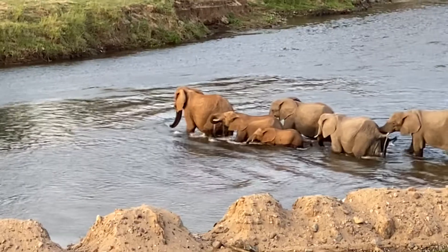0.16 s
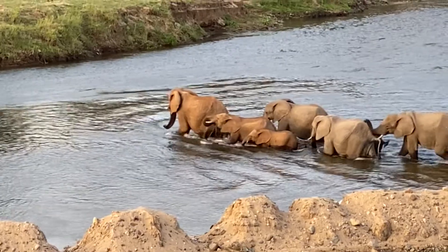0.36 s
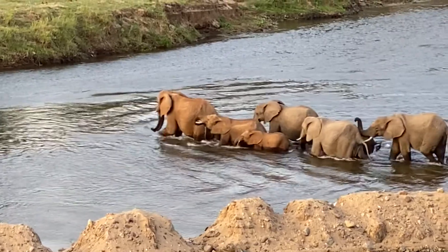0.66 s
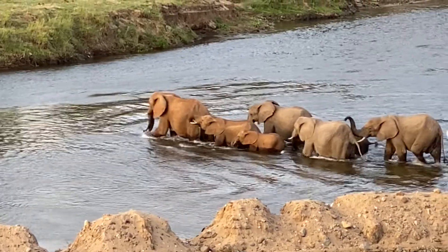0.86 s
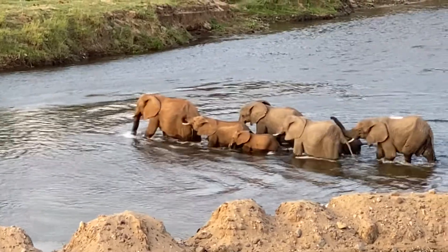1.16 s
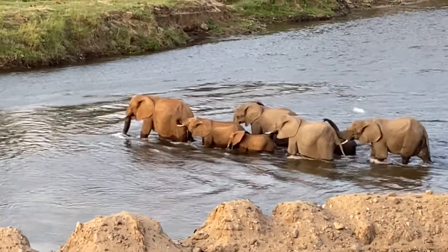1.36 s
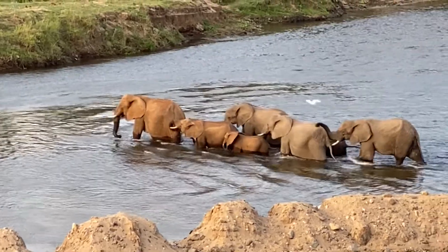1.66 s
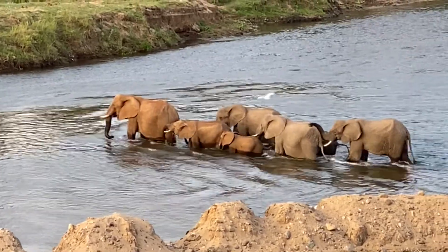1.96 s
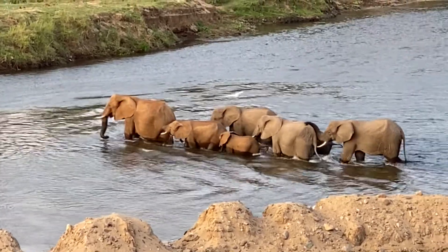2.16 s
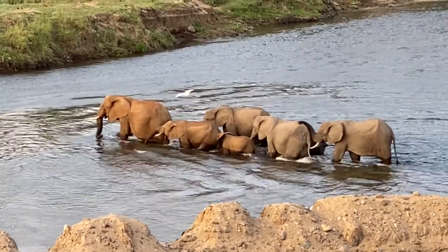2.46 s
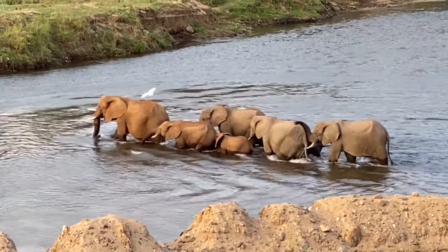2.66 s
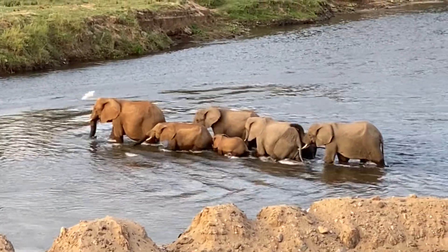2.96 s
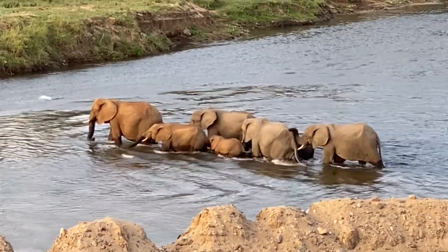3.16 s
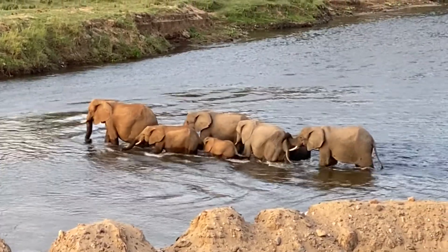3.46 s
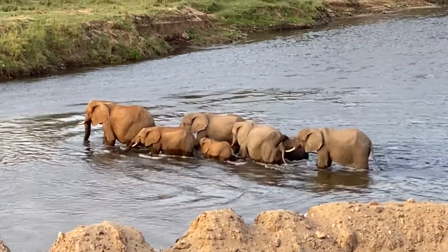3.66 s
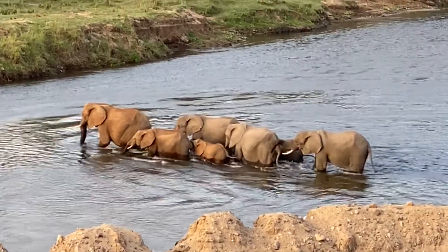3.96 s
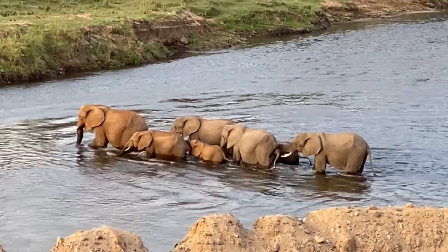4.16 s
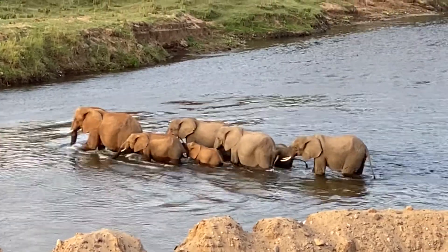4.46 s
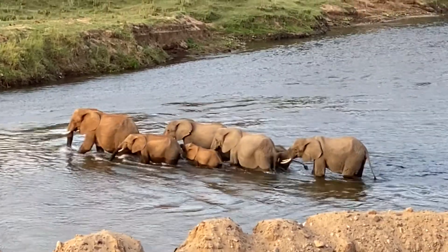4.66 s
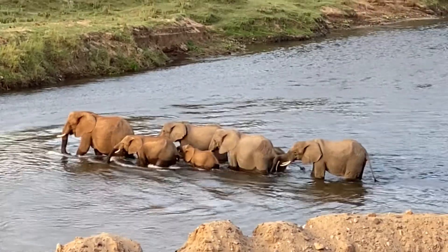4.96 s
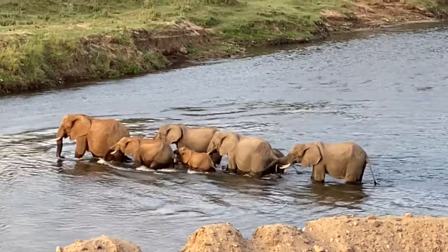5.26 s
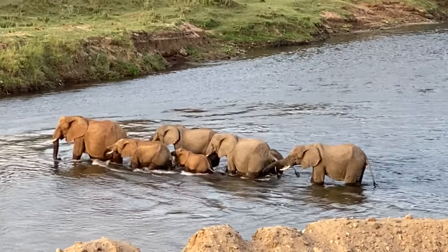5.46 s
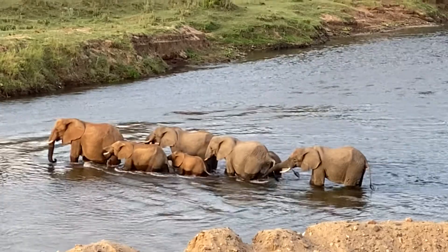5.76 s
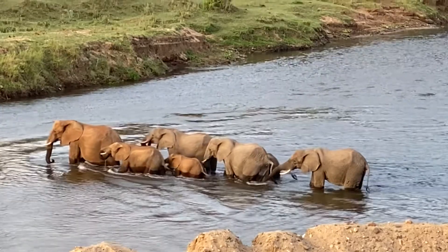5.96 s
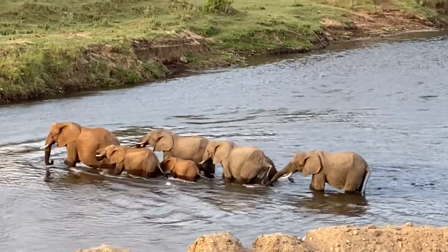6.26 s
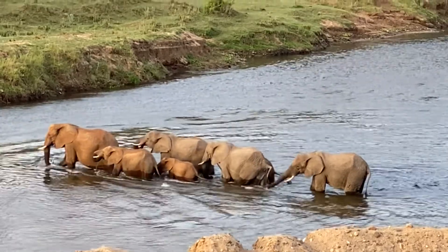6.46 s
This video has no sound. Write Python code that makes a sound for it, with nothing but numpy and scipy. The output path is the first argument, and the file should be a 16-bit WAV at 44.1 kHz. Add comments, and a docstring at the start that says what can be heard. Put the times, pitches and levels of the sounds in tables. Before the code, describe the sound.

A quiet riverbank with flowing water, small splashy swishes and snaps, and insects rasping in short pulsing phrases. A mellow bird whistle slides upward again and again at even spacing. Distant birds add tiny chips, a quick run of falling notes and rough trills. The later part is dominated by lumpy, low wind buffets hitting the exposed microphone, easing briefly before another strong gust at the end.

```python
"""Insects buzz and rasp over rushing water and faint steady tones; a bird soon begins its rising whistle.
The scene is a river bank in open country where elephants wade across, splashing, and more birds sing far off.
Gusts of wind buffet the microphone in deep lumps. Birds are gliding near-sines with a scattered echo;
insects are resonant noise gated by wing strokes; water and wind are coloured noise with changing level."""
import sys
import numpy as np
from scipy import signal
from scipy.io import wavfile
from scipy.ndimage import uniform_filter1d

SR = 44100
rng = np.random.default_rng(int(sys.argv[2]) if len(sys.argv) > 2 else 0)


def to_wav(sig):
    """Store sig (one row per channel, or 1-D mono) as 16-bit WAV at the path in sys.argv[1].

    Samples outside -1..1 are clipped; the rate is SR.
    """
    pcm = np.clip(np.atleast_2d(sig), -1, 1) * 32767
    pcm = np.round(pcm).astype(np.int16)
    wavfile.write(sys.argv[1], SR, pcm.T)  # frames by channels


def boost(x):
    """Linear amplitude factor 10**(x/20) for a level x in decibels (scalar or array-like)."""
    u = np.asarray(x, float) / 20
    return 10 ** u


N = 290619
TIME = np.arange(N) / SR

# Steady thin tones. Each row: frequency in Hz, mean level in dB.
THIN_TONES = [(962, -66), (1492, -67), (1733, -58.5), (1974, -55), (2214, -67), (2355, -67.5)]

# Level of a long-winded insect. Each row: time in seconds, level in dB.
BUZZER_LEVEL = [(0, -56), (1.5, -59.5), (1.7, -65.5), (3.1, -66), (3.35, -60), (5.45, -56.5), (5.6, -65),
                (6.59, -70)]
BUZZER_HZ, BUZZER_STROKES_PER_S = 4440, 69
# Phrases of the rasping insect, of uneven length; long and short alternate only at first.
# Each row: start in seconds, length in seconds.
RASP_PHRASES = [(-.1, .43), (.67, 0.27), (1.24, .4), (1.87, 0.29), (2.44, 0.42), (3.04, 0.32), (3.71, 0.36),
                (4.28, 0.35), (4.95, 0.39), (5.59, 0.36), (6.21, .36)]
RASP_DB = -60.5

# Colour of the river's rush. Each row: frequency in Hz, relative density in dB per Hz.
RUSH_COLOUR = [(24, -35), (40, -3), (66, -2.5), (167, -18.5), (235, -8.5), (523, -5), (806, -14.5),
               (938, -5.5), (1410, -8.5), (1790, -4.5), (3820, -18.5), (4540, -29), (7000, -37),
               (9100, -94), (15400, -120)]
RUSH_DB = -46.5
# Swishes of spray as the animals wade. Each row: centre in seconds, spread in seconds, level in dB.
SWISHES = [(.16, 0.072, -67), (.48, 0.034, -58), (2.07, .04, -71), (2.85, 0.02, -65), (3.64, 0.054, -69.5),
           (3.9, 0.036, -70), (4.5, 0.025, -61.5), (4.8, 0.024, -72), (5.44, 0.053, -66)]
# Colour of the hiss and spray. Each row: frequency in Hz, relative density in dB per Hz.
HISS_COLOUR = [(4500, 9.5), (6800, -2.5), (8200, 5.5), (10000, 4), (11500, 3), (12800, -5), (14500, 2),
               (16600, 0)]
# Lone snaps of water or grass. Each row: start in seconds, nominal peak in dB before filtering.
WATER_SNAPS = [(0.165, -39), (1.4052, -44), (1.579, -45), (2.836, -46), (4.2816, -42.5), (4.4653, -44),
               (4.568, -26), (4.786, -44.5), (5.9878, -42)]
# Plops of water. Each row: start in seconds, frequency in Hz, starting level in dB.
WATER_PLOPS = [(.115, 440, -46), (1.052, 520, -47)]
PLOP_T60_S = 0.06

# Straight glides of farther birds.
# Each row: start in seconds, length in seconds, first Hz, last Hz, nominal level in dB.
FAR_GLIDES = [(2.694, .018, 4200, 3820, -53), (2.671, .022, 2780, 3070, -52), (2.74, .03, 4600, 4650, -57),
              (4.29, .05, 4900, 5230, -59), (4.69, .043, 3160, 3140, -53), (4.737, .022, 3080, 2900, -50),
              (4.765, .018, 2800, 2680, -52), (4.785, .052, 2620, 2520, -42), (4.833, .08, 2510, 2535, -39),
              (5.245, .035, 3720, 3700, -57), (5.852, .02, 4450, 5000, -54), (5.89, .065, 2500, 3070, -55),
              (5.99, .1, 2850, 2800, -60)]
# A songbird's run of scooped notes. Each row: start in seconds, middle Hz, nominal level in dB.
SCOOPED_NOTES = [(5.292, 3420, -45), (5.344, 3320, -43.5), (5.393, 3220, -49), (5.417, 3260, -53),
                 (5.445, 3166, -48), (5.488, 3200, -53)]
SCOOP_S, SCOOP_FALL_HZ, SCOOP_LIFT_HZ = 0.029, 260, 90
# Arched chips of small birds. Each row: start in seconds, length in seconds, top Hz, nominal level in dB.
ARCHED_CHIPS = [(2.54, .036, 3830, -57), (3.44, .02, 5500, -63), (3.997, .03, 4950, -56),
                (4.095, .04, 4820, -59), (4.385, .02, 5350, -54), (4.405, .025, 5450, -52),
                (4.48, .045, 5400, -54)]
ARCH_SHARE = 0.065  # both ends lie this share below the top
# Warbled, rough notes. Each row: start in seconds, length in seconds, first Hz, last Hz,
# swing in Hz, swings per second, nominal level in dB.
WARBLES = [(5.585, .1, 6750, 6800, 110, 90, -64), (4.98, .27, 2930, 2770, 180, 62, -50.5),
           (5.655, .1, 4600, 2800, 250, 70, -55), (3.785, .055, 6400, 7100, 200, 90, -67),
           (5.345, .065, 6450, 6850, 250, 80, -66)]

# The whistling bird. Each row: start in seconds, climb in seconds, first Hz, middle Hz, top Hz,
# droop after the top in seconds, nominal level in dB.
RISING_WHISTLES = [(.255, .14, 1740, 1830, 1965, 0.046, -49), (1.03, .19, 1754, 1870, 1943, 0, -49),
                   (1.82, 0.18, 1755, 1823, 1947, 0.068, -38.5),
                   (2.585, 0.2, 1785, 1874, 1950, 0.044, -38.5), (3.396, .19, 1752, 1814, 1965, .04, -35.5),
                   (4.182, .195, 1772, 1834, 1965, 0, -36), (5.015, .155, 1795, 1888, 1960, 0, -37.5),
                   (5.788, 0.17, 1768, 1854, 1925, 0, -40), (6.53, 0.17, 1760, 1840, 1955, 0, -42)]
DROOP_MEAN_HZ_PER_S, DROOP_DB = 800, -6.5  # some linger, softer and sinking; dB against the whistle
CLOSING_S, CLOSING_HZ, CLOSING_DB = 0.055, 1745, -12  # short low note; dB against the whistle

# Buffets of wind. Each row: peak in seconds, nominal rumble level in dB, time to fade by 20 dB in seconds.
WIND_BUFFETS = [(.26, -50, 0.2), (.628, -41, .03), (.672, -40, .03), (2.267, -47.5, .06), (2.395, -35, .05),
                (2.812, -32, 0.07), (2.855, -40, .06), (3.3, -46, 0.1), (3.74, -50, .1), (3.81, -24, 0.09),
                (3.885, -20.5, 0.09), (3.935, -20.5, 0.08), (3.985, -11.5, 0.08), (4.018, -14, 0.06),
                (4.093, -20, .07), (4.17, -29, 0.08), (4.245, -17, 0.12), (4.35, -26, 0.02),
                (4.45, -30, .05), (4.52, -17.5, 0.1), (4.6, -21, 0.04), (4.69, -36, .1),
                (4.782, -28.5, .06), (4.825, -24, .07), (4.876, -20, 0.07), (4.945, -24, 0.06),
                (5.021, -21.5, 0.07), (5.14, -28, 0.1), (5.205, -29, .05), (5.32, -30, 0.15),
                (5.428, -21, 0.05), (5.5, -25, 0.09), (5.64, -32.5, 0.08), (5.75, -37, 0.1),
                (6.044, -31, 0.23), (6.28, -22.5, 0.07), (6.319, -17.5, .07), (6.4, -32, 0.15),
                (6.44, -22, .06), (6.497, -10, 0.09), (6.535, -15.5, 0.08)]
RISE_OVER_FADE, BREEZE_DB = 0.79, -60  # a buffet rises faster than it fades; level between buffets
# Colour of the rumble. Each row: frequency in Hz, relative density in dB per Hz.
RUMBLE_COLOUR = [(26, -43), (38, -4), (52, 8.5), (85, 3.5), (135, -4), (200, -17), (280, -25.5)]
# Bursts of flutter. Each row: start in seconds, hold in seconds, nominal level in dB.
FLUTTER_BURSTS = [(1.917, .01, -44.5), (3.796, 0.0043, -30.5), (3.918, .004, -27.5), (3.956, 0.032, -17),
                  (4, .008, -21), (4.022, .005, -30), (4.066, 0.024, -30.5), (4.215, .01, -34),
                  (4.241, .03, -23), (4.289, 0.014, -35.5), (4.468, .016, -34), (4.493, 0.115, -30),
                  (4.86, .035, -36), (5.003, 0.0094, -35), (6.259, 0.0036, -28.5), (6.298, 0.045, -28),
                  (6.43, 0.012, -36), (6.458, .016, -28.5), (6.487, 0.045, -22), (6.544, 0.029, -39)]
FLUTTER_RISE_DB_PER_S, FLUTTER_FALL_DB_PER_S, FLUTTER_REST_DB = 2300, 1250, -59.5
# Colour of the flutter. Each row: frequency in Hz, relative density in dB per Hz.
EDDY_COLOUR = [(100, 11), (185, 7), (320, 0), (600, -11.5), (1000, -26), (1350, -52)]
FLUTTER_BRIGHTENS, FLUTTER_EVEN_DB = 0.38, -21  # extra treble dB per dB of strength; none at this strength
# Small quick eddies come first: share of the hold that stays bright, lag of the lows
BRIGHT_SHARE, LOWS_LAG_S = 0.8, 0.008
# Eddies that snap across the port. Each row: start in seconds, peak in dB.
EDDY_POPS = [(3.9195, -10), (4.006, -11), (4.073, -23), (4.230, -14), (4.494, -21), (5.007, -24),
             (6.298, -22), (6.488, -15)]
POP_S = 0.00085  # time to the deepest point


def rms_one(x):
    """Normalization: divides a signal by its root mean square."""
    return x / np.sqrt(np.mean(x ** 2) + 1e-20)


def drift(rate_hz):
    """Slow random fluctuation: white noise through two equal poles, with rms 1."""
    r = np.exp(-40 * np.pi * rate_hz / SR)  # made at a twentieth of the sample rate
    white = rng.standard_normal(N // 20 + 4002)
    slow = signal.lfilter([1], [1, -2 * r, r * r], white)[4000:]
    return np.interp(np.arange(N) / 20, np.arange(len(slow)), rms_one(slow))


def band(x, low_hz, high_hz):
    """Band limitation by a Butterworth filter."""
    return signal.sosfilt(signal.butter(2, [low_hz, high_hz], "band", fs=SR, output="sos"), x)


def noise_bands(colour, count):
    """Spectral synthesis: yields weighted bands of noise; neighbouring bands are independent."""
    hz, db = np.transpose(colour)
    edges = np.geomspace(hz[0], hz[-1], count + 1)
    white = rng.standard_normal((2, N))
    for k in range(count):
        centre = np.sqrt(edges[k] * edges[k + 1])
        gain = boost(np.interp(np.log(centre), np.log(hz), db))
        yield gain * band(white[k % 2], edges[k], edges[k + 1])


def clicks(events):
    """Impulse excitation: one sample per event."""
    out = np.full(N, 1e-18)
    for start, db in events:
        out[round(start * SR)] = boost(db)
    return out


def gate(start, length, edge):
    """Smooth gating: sine-squared edges, each lasting edge seconds."""
    inside = np.minimum(TIME - start, start + length - TIME)
    return np.sin(np.pi / 2 * np.clip(inside / edge, 0, 1)) ** 2


def tones():
    """Steady sinusoids: slight phase drift and a random waver in level."""
    return sum(np.sqrt(2) * boost(db + 2.8 * drift(4.5)) * np.sin(2 * np.pi * (hz * TIME + 0.1 * drift(3.1)))
               for hz, db in THIN_TONES)


def buzzing_insect():
    """Pulsed resonance: wing strokes gate noise and strike ticks within a narrow band."""
    strokes = np.cumsum(BUZZER_STROKES_PER_S * (1 + 0.0015 * drift(1.5))) / SR % 1
    buzz = rng.standard_normal(N) * (0.6 + np.exp(-strokes / 0.051))
    ticks = 1.0 * (np.diff(strokes, prepend=0) < 0)  # each stroke opens with a like tick
    buzz, ticks = (rms_one(band(v, BUZZER_HZ - 260, BUZZER_HZ + 260)) for v in (buzz, ticks))
    seconds, db = np.transpose(BUZZER_LEVEL)
    return rms_one(buzz + 0.6 * ticks) * boost(np.interp(TIME, seconds, db))


def rasping_insect():
    """Amplitude modulation: wing strokes beat resonant noise, which sounds in phrases."""
    beats = 1 + 0.6 * np.sin(2 * np.pi * 62 * TIME + 2 * drift(6.0))
    noise = band(rng.standard_normal(N), 4450, 5300)
    rasp = rms_one(band(noise, 4400, 5300) * beats)
    phrases = sum(gate(start, length, 0.067) for start, length in RASP_PHRASES)
    return rasp * boost(RASP_DB + 1.1 * drift(7.8)) * phrases


def rush():
    """Broadband flow noise: all bands share a slow swell, and each also fluctuates alone."""
    swell = drift(1.17)
    flow = sum(noise * boost(0.77 * swell + 1.17 * drift(16.4)) for noise in noise_bands(RUSH_COLOUR, count=20))
    return boost(RUSH_DB) * rms_one(flow)


def hiss_and_spray():
    """Treble noise: a steady hiss, partly the microphone's own, with swishes of spray swelling over it."""
    hiss = rms_one(sum(noise_bands(HISS_COLOUR, count=16)))
    swishes = sum(boost(db) * np.exp(-((TIME - s) / spread) ** 2) for s, spread, db in SWISHES)
    level = boost(-71.0) + swishes
    return hiss * level * boost(1.3 * drift(45.0) + 1.7 * drift(13.5))  # the level flickers


def snaps():
    """Transient excitation: each impulse releases a short decaying crack of noise."""
    crack = rng.standard_normal(220) * boost(-60 * np.arange(220) / SR / 0.018)
    cracks = signal.fftconvolve(clicks(WATER_SNAPS), crack)[:N]
    return boost(-4.5) * band(cracks, 6700, 11300) + band(cracks, 1700, 6800)


def plops():
    """Cavity resonance: a closing pocket of air rings as a decaying sinusoid."""
    out = 0
    for start, hz, db in WATER_PLOPS:
        t = np.maximum(TIME - start, 0)
        out = out + boost(db - 60 * t / PLOP_T60_S) * np.sin(2 * np.pi * hz * t)
    return out


def notes(rows, swell, softness, waver_db):
    """Frequency modulation: near-sines glide through three pitches; swell (dB) favours the later part."""
    out = np.zeros(N)
    for start, length, first_hz, middle_hz, last_hz, db in rows:
        at = round(start * SR)
        u = np.arange(round(length * SR)) / (length * SR)  # 0 to 1 over the note
        hz = np.polyval(np.polyfit([0, 0.5, 1], [first_hz, middle_hz, last_hz], 2), u)
        shape = np.sin(np.pi * u) ** softness * boost(swell * (np.minimum(u, 0.75) - 1.75))
        tone = np.sqrt(2) * boost(db) * shape * np.sin(2 * np.pi * np.cumsum(hz) / SR)
        out[at:at + len(u)] += tone[:N - at]
    return out * boost(waver_db * drift(35.0))


def far_birds():
    """Pitch contour: straight glides, scooped notes and arched chips."""
    rows = [(s, length, first, (first + last) / 2, last, db) for s, length, first, last, db in FAR_GLIDES]
    rows += [(s, SCOOP_S, hz + SCOOP_FALL_HZ, hz, hz + SCOOP_LIFT_HZ, db) for s, hz, db in SCOOPED_NOTES]
    for s, length, top, db in ARCHED_CHIPS:
        end = top * (1 - ARCH_SHARE)
        rows.append((s, length, end, top, end, db))
    return notes(rows, swell=0, softness=0.21, waver_db=1.0)


def trill():
    """Joint modulation: pitch swings fast and unevenly about a glide while the level beats with it."""
    out = 0
    for start, length, first_hz, last_hz, swing_hz, per_s, db in WARBLES:
        turn = 2 * np.pi * per_s * TIME + 2.0 * drift(25.0)
        glide = np.interp(TIME, [start, start + length], [first_hz, last_hz])
        hz = glide + swing_hz * np.sin(turn)
        beat = 1 - 0.4 * np.cos(turn)
        level = boost(db + 1.6 * drift(25.0)) * gate(start, length, 0.21 * length) * beat
        out = out + np.sqrt(2) * level * np.sin(2 * np.pi * np.cumsum(hz) / SR)
    return out


def whistler():
    """Pitch contour: each rising whistle may droop from its top; all but the last add a low note."""
    rows = []
    for s, climb, first, middle, top, droop, db in RISING_WHISTLES:
        rows.append((s, climb, first, middle, top, db))
        if droop:
            fall = DROOP_MEAN_HZ_PER_S * droop
            rows.append((s + climb, droop, top, top - fall / 4, top - fall, db + DROOP_DB))
    for s, climb, *_, db in RISING_WHISTLES[:-1]:
        rows.append((s + climb, CLOSING_S, CLOSING_HZ, CLOSING_HZ, CLOSING_HZ, db + CLOSING_DB))
    return notes(rows, swell=2.2, softness=0.25, waver_db=1.3)


def banks(x, t60, scatter_db):
    """Diffuse reflection: banks and bushes send back an exponentially dying scatter."""
    t = np.arange(round(0.6 * SR)) / SR
    tail = rng.standard_normal(len(t)) * boost(-60 * t / t60)
    tail *= boost(scatter_db) / np.sqrt(np.sum(tail ** 2))
    tail[0] = 1  # the direct sound
    return signal.fftconvolve(x, tail)[:N]


def swells(start, hold, db, rise_db_per_s, fall_db_per_s, rest_db):
    """Power addition: swells climb, hold and fall in straight dB slopes above a resting level."""
    coarse = TIME[::20, None]
    early = np.maximum(start - coarse, 0)
    late = np.maximum(coarse - start - hold, 0)
    each = boost(db - rise_db_per_s * early - fall_db_per_s * late)
    power = np.sum(each ** 2, axis=1) + boost(rest_db) ** 2
    return np.interp(TIME, TIME[::20], np.sqrt(power))


def eddies(colour, evenness, size):
    """Turbulent noise: dividing by its own running strength (size in samples) evens its level."""
    out = sum(noise_bands(colour, count=7))
    strength = np.sqrt(uniform_filter1d(out ** 2, size=size) + 1e-12)
    return rms_one(out / strength ** evenness)


def rumble():
    """Low-frequency turbulence: each buffet raises and releases a deep noise."""
    peak, db, fade = np.transpose(WIND_BUFFETS)
    push = swells(peak, 0, db, 20 / (RISE_OVER_FADE * fade), 20 / fade, BREEZE_DB)
    return push * boost(1.4 * drift(14.0)) * band(eddies(RUMBLE_COLOUR, 0.65, size=1100), 28, 270)


def flutter():
    """Eddy scale: small quick eddies lead, large slow ones lag, and strong bursts are brighter."""
    start, hold, db = np.transpose(FLUTTER_BURSTS)
    slopes = FLUTTER_RISE_DB_PER_S, FLUTTER_FALL_DB_PER_S, FLUTTER_REST_DB
    quick = swells(start, BRIGHT_SHARE * hold, db, *slopes)
    slow = swells(start + LOWS_LAG_S, hold, db, *slopes)
    brightness = (quick / boost(FLUTTER_EVEN_DB)) ** FLUTTER_BRIGHTENS
    low = eddies(EDDY_COLOUR[:3], 1.0, size=600) * boost(1.8 * drift(40.0))
    high = eddies(EDDY_COLOUR[2:], 1.0, size=600) * boost(-4.5 + 2.5 * drift(72.0))
    return slow * low + quick * brightness * high


def pops():
    """Pressure pulse: an eddy crossing the port gives one smooth inward suck."""
    u = np.arange(400) / SR / POP_S
    suck = u ** 2 * np.exp(2 - 2 * u)
    return -signal.fftconvolve(clicks(EDDY_POPS), suck)[:N]


def scene():
    """Superposition: birds ring off the banks, the farther ones more; wind acts at the microphone itself."""
    near = banks(whistler(), t60=0.67, scatter_db=-7.0)
    far = banks(far_birds() + trill(), t60=0.5, scatter_db=-4.0)
    insects = buzzing_insect() + rasping_insect()
    water = rush() + snaps() + plops()
    wind = rumble() + flutter() + pops()
    return (tones() + insects + water + hiss_and_spray() + far + near + wind)[None, :]


def band_limit(x):
    """A steep low-pass at the top of the band."""
    return signal.sosfilt(signal.butter(12, 16860, fs=SR, output="sos"), x)


def record(dry):
    """Band limitation: a steep elliptic low-pass removes the top of the spectrum."""
    low_pass = signal.ellip(12, 0.5, 40, 15780, fs=SR, output="sos")  # ripple dB, stop dB, cutoff Hz
    mix = signal.sosfilt(low_pass, dry)
    return band_limit(mix)


dry = scene()
out = record(dry)
to_wav(out)
```